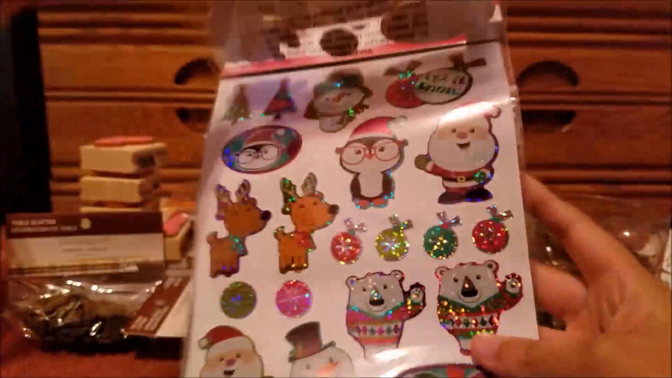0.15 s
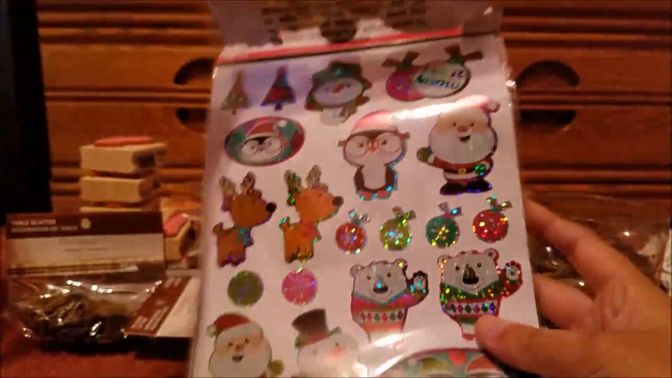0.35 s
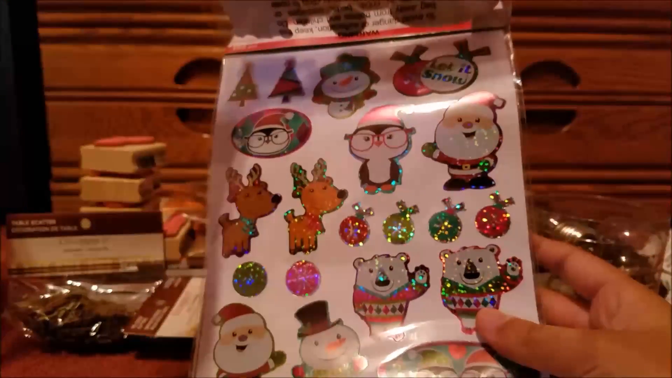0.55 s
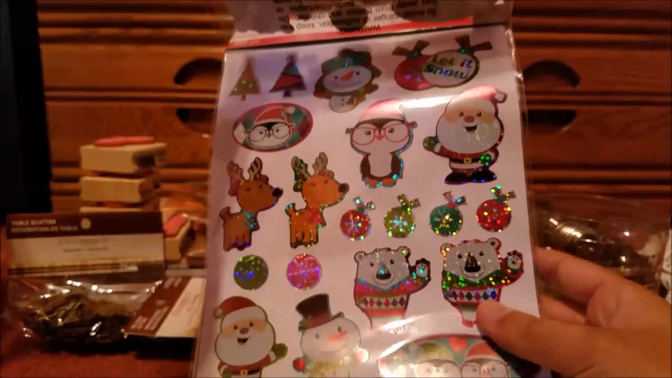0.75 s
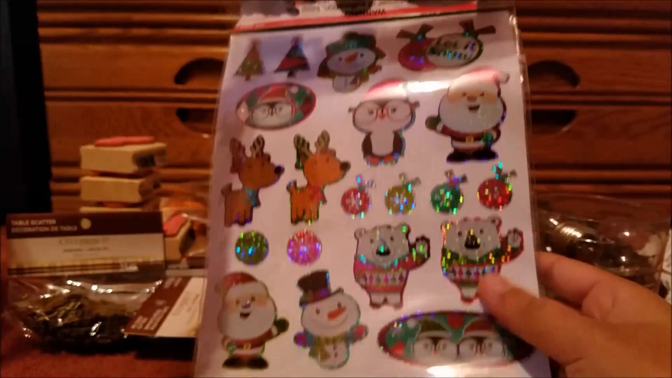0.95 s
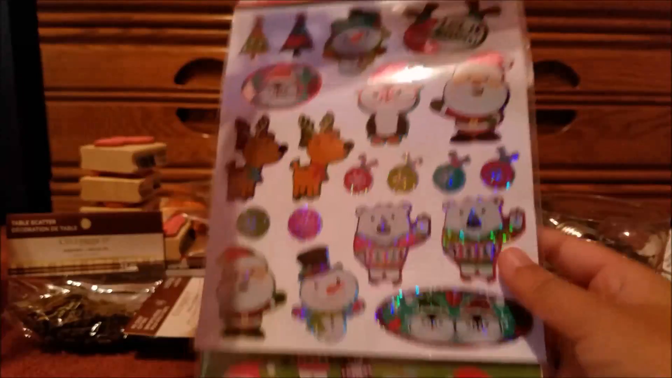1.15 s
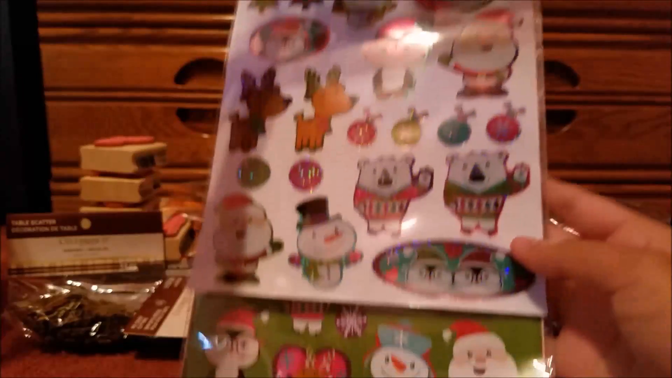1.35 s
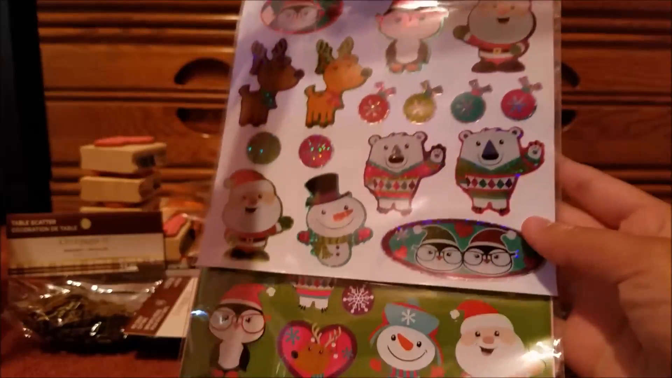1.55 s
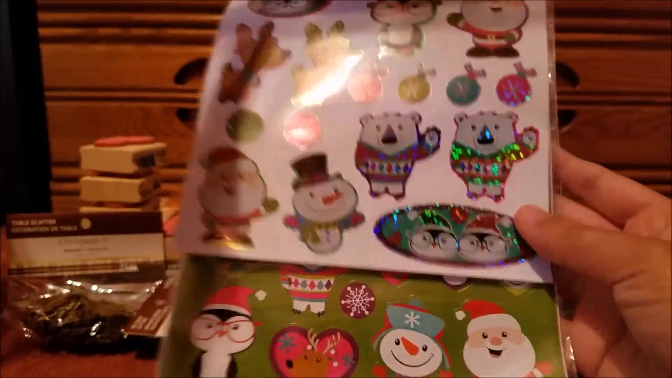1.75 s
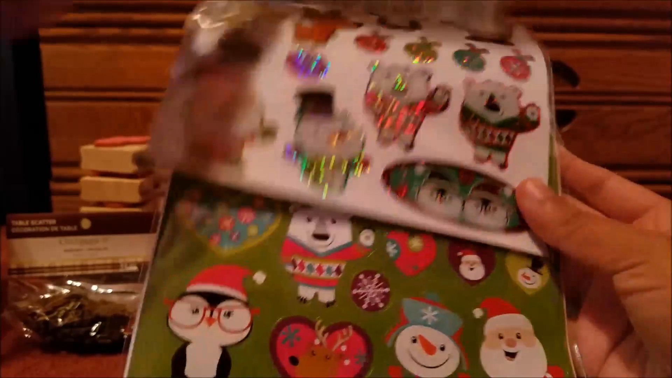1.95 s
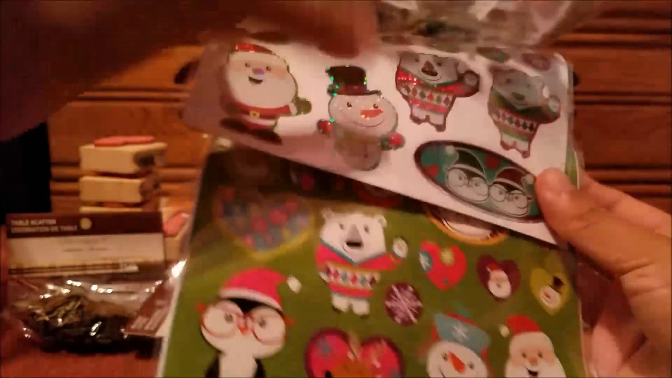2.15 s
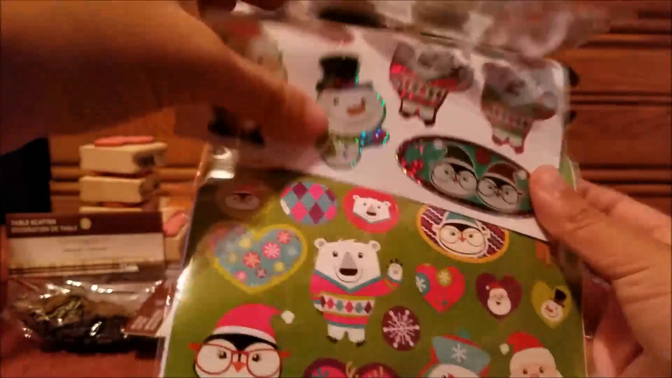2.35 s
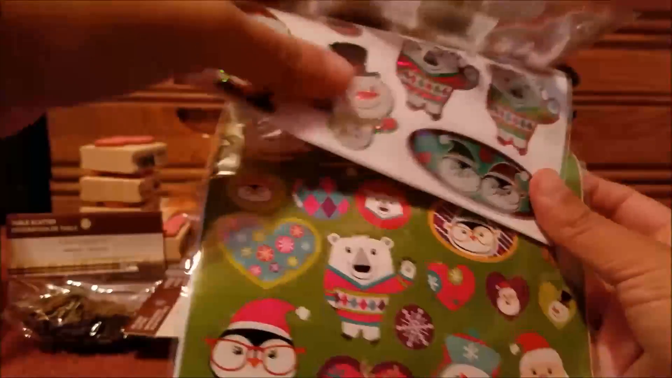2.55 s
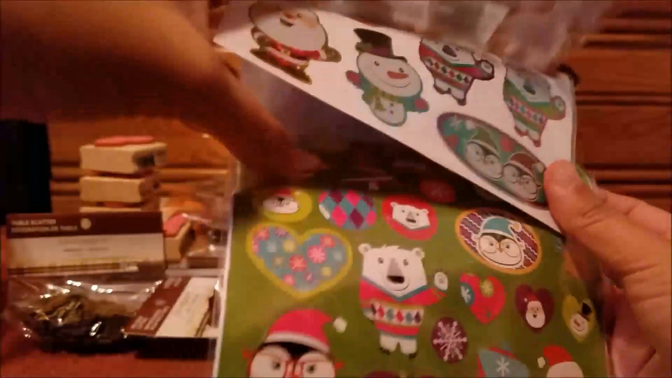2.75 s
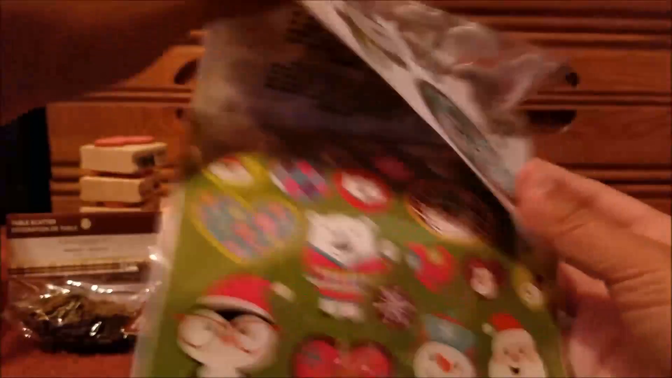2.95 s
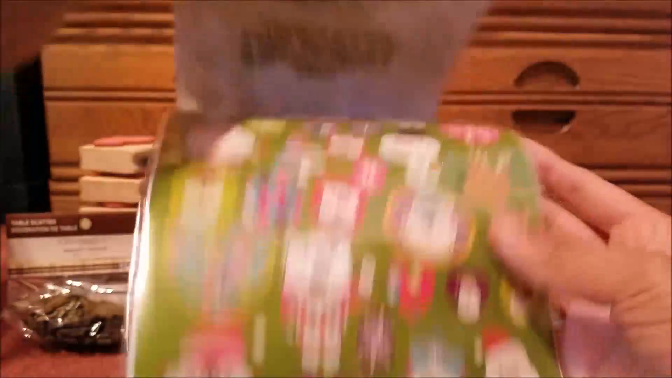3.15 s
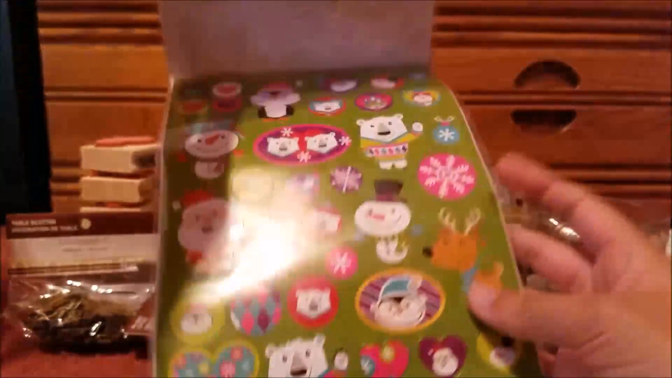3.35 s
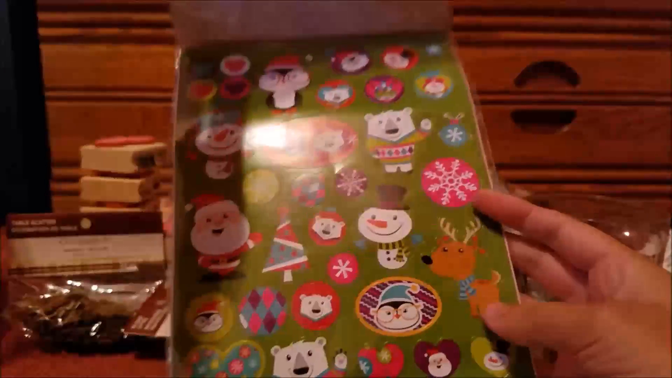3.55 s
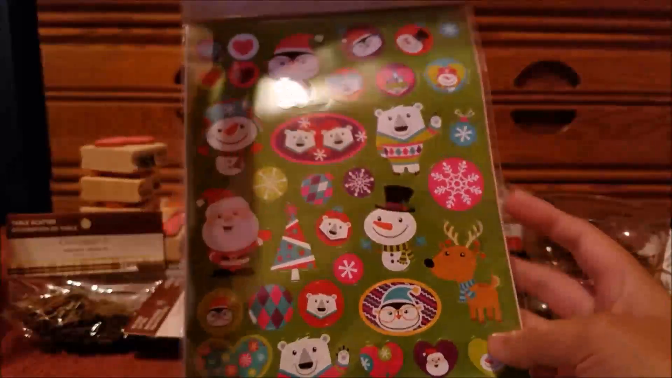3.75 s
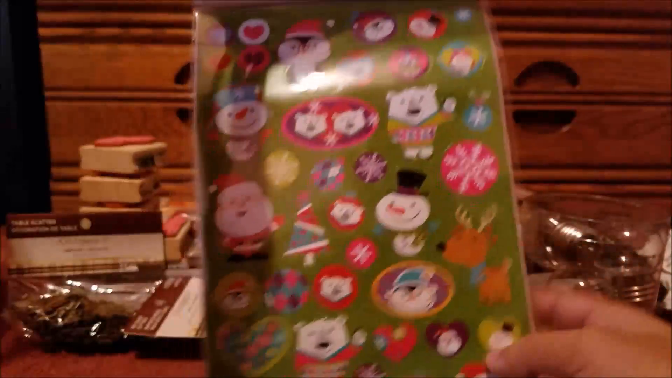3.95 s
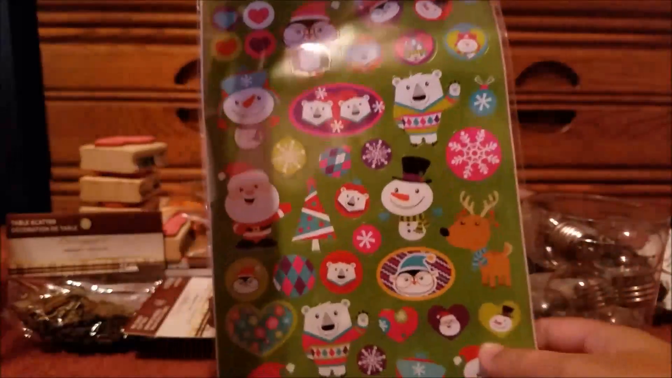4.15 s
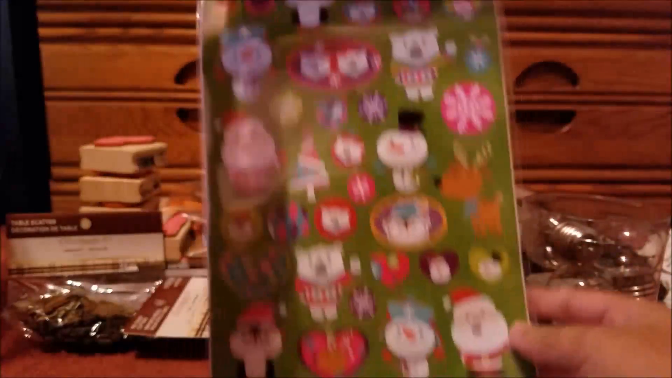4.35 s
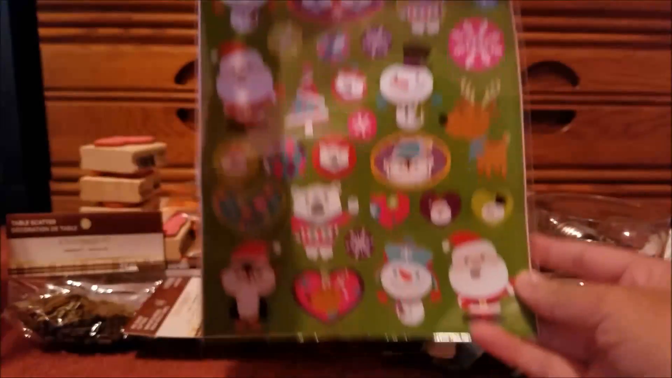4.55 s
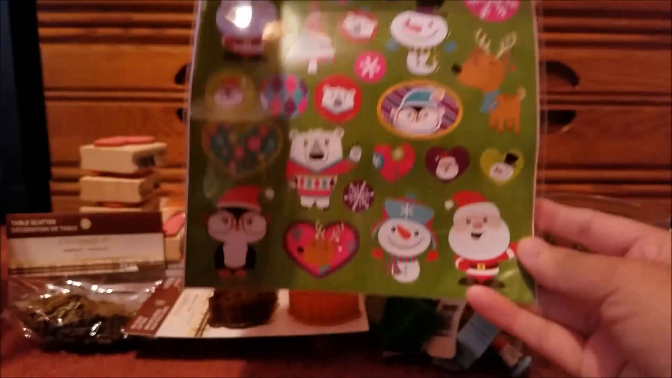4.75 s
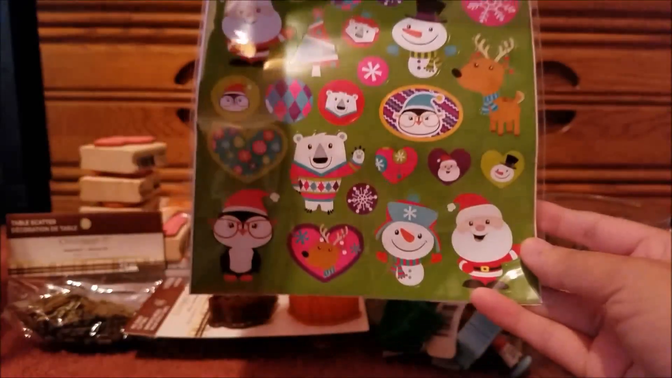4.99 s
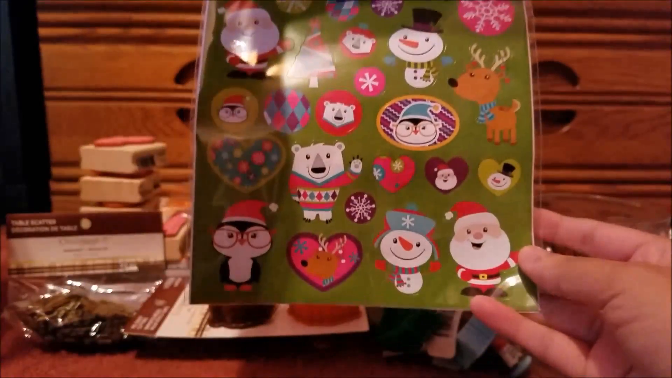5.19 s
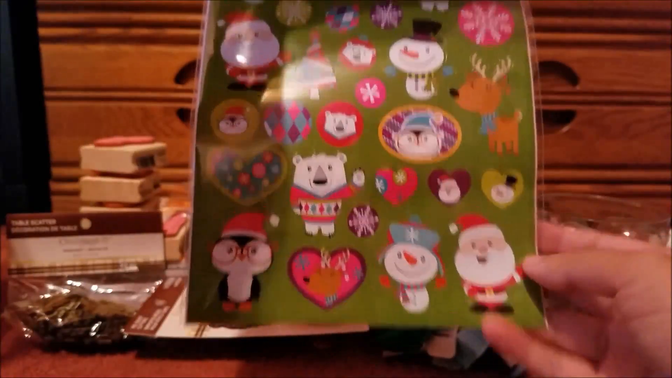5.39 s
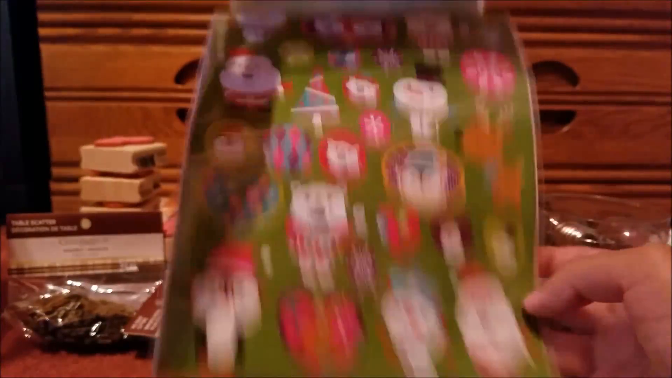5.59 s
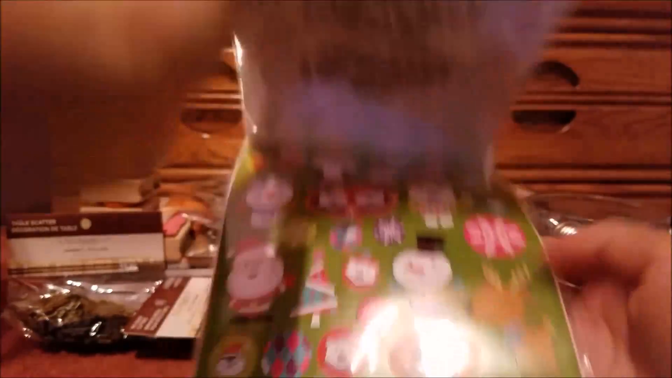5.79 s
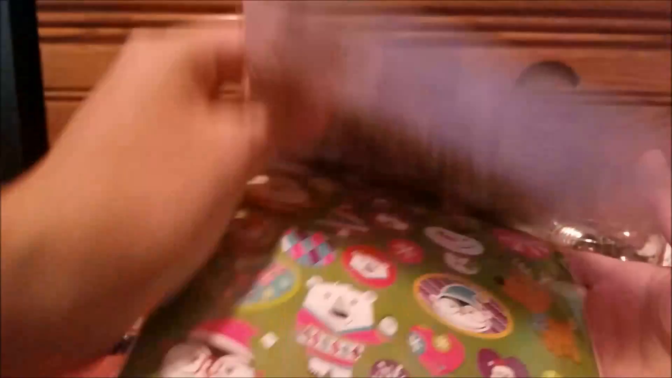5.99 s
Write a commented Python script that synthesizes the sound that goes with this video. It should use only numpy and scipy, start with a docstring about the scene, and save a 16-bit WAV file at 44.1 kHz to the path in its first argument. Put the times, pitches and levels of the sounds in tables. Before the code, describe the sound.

Hands flex sticker sheets in a clear plastic sleeve close to stereo microphones in a quiet room. Faint small ticks come first, then a hard, bright snap at about one second. Denser crinkling and sliding follow through the middle, thinning into near-quiet with a few soft ticks, before crackles return at the end.

```python
"""Creases snapping in a plastic sheet

Hands turn glossy sticker sheets in a clear sleeve, close to two microphones in a quiet room.
Each crease that flips gives a short noise crack and excites a damped bending swing, the pop.
Small creases crackle at random; fingers and sheets slide with a noise hiss, and the flexing pad
pushes soft low air. A short room tail and a quiet floor of hum and hiss complete the sound.
"""
import sys
import numpy as np
from scipy import signal
from scipy.fft import rfft, irfft, next_fast_len
from scipy.io import wavfile
from scipy.ndimage import uniform_filter1d, map_coordinates

SR = 44100
rng = np.random.default_rng(int(sys.argv[2]) if len(sys.argv) > 2 else 0)


def log_audio(samples):
    """Write samples as a 16-bit WAV file to the path given in sys.argv[1]."""
    # one column per channel
    frames = np.atleast_2d(samples).T
    # limit to full scale, then quantise
    limited = np.clip(frames, -1, 1)
    pcm = np.round(limited * 32767).astype(np.int16)
    wavfile.write(sys.argv[1], SR, pcm)


N = 265691  # samples

# Creases that flip loudly; levels are those of the drive, ahead of the filters:
# (time [s], pop level [dB], pop frequency [Hz], crack level [dB], sizzle level [dB])
CREASE_FLIPS = [(0.0088, -47, 1370, -61, -65.5), (0.0218, -52, 1500, -51, -63),
                (0.1348, -40, 1180, -43, -48.5), (0.177, -32, 880, -35, -42), (0.184, -29, 870, -51, -59),
                (0.2004, -38, 1300, -40, -48), (0.2157, -33.5, 1110, -45, -54),
                (0.2287, -38.5, 1510, -43.5, -52), (0.2716, -40, 1390, -58, -45),
                (0.3087, -33, 910, -35.5, -48), (0.3166, -34, 830, -43, -68), (0.3493, -33, 1630, -15, -21),
                (0.408, -40, 890, -59, -66), (0.4142, -34, 1450, -37, -44), (1.0146, -39, 1540, -58, -60),
                (1.0427, -23, 1140, -62, -70), (1.0506, -3.5, 1248, -15.5, -17),
                (1.0642, -26, 1400, -29.5, -44), (1.1083, -53, 2410, -23.5, -26.5),
                (1.1119, -48, 1380, -46, -35), (1.3025, -35, 900, -63, -70),
                (1.6149, -45, 1140, -68.5, -69), (1.671, -32.5, 1255, -54, -66),
                (1.729, -38.5, 1105, -74.5, -61), (1.766, -28, 1240, -47, -61),
                (1.7719, -25, 1003, -44, -61), (1.8897, -33, 1270, -40.5, -55),
                (1.9103, -28.5, 2380, -34, -43), (1.9395, -22.5, 1290, -26.5, -33.5),
                (1.9714, -14.5, 1280, -34, -51), (1.9777, -24, 950, -51, -55), (1.992, -52, 1430, -32, -39),
                (2.001, -27.5, 1290, -54, -61), (2.0751, -34, 1380, -57, -46),
                (2.0864, -23.5, 1200, -70, -62), (2.0946, -15, 1346, -27, -35),
                (2.1032, -15, 1580, -23, -32.5), (2.1312, -27, 1260, -24, -28),
                (2.1515, -13, 1440, -26.5, -34), (2.1907, -40, 1810, -33.5, -39.5),
                (2.2384, -31.5, 1360, -68, -69), (2.286, -33, 1380, -63, -68),
                (2.3288, -22.5, 1520, -25.5, -28.5), (2.375, -25.5, 2500, -40, -46),
                (2.4042, -48, 1600, -47, -43.5), (2.4214, -31.5, 1220, -42, -54),
                (2.4315, -29, 1180, -55, -56), (2.4501, -46, 1420, -48, -52),
                (2.536, -31.5, 1180, -62, -70), (2.5446, -32, 806, -66, -47), (2.5815, -33, 1250, -49, -46),
                (2.5929, -27.5, 1330, -36, -58), (2.6184, -28.5, 2550, -42, -51),
                (2.6518, -31, 2370, -34.5, -35.5), (2.7011, -32.5, 1630, -44.5, -64),
                (2.7342, -37.5, 1220, -54, -69), (2.8279, -38.5, 1480, -56, -59),
                (2.871, -31.5, 1510, -35, -41), (2.8782, -28, 2180, -48, -56), (2.897, -36, 1480, -49, -46),
                (2.9414, -35.5, 2540, -38, -44), (2.9684, -31, 1210, -43, -65),
                (2.9959, -33.5, 1330, -40.5, -58), (3.0327, -34, 1270, -35.5, -36),
                (3.0515, -31, 2330, -32.5, -39), (3.1018, -29, 1020, -32.5, -44),
                (3.1336, -30, 2690, -22.5, -34), (3.2435, -33.5, 1230, -54, -48),
                (3.2951, -21.5, 1420, -40, -63), (3.3484, -34, 1750, -56, -65),
                (3.3619, -25.5, 1220, -26.5, -44), (3.3708, -43, 1440, -42, -57),
                (3.3988, -38, 1380, -41, -33.5), (3.4207, -29.5, 854, -52, -76),
                (3.4966, -28.5, 1950, -38, -49), (3.5186, -34, 1240, -48, -57),
                (3.816, -48, 1260, -43, -43), (4.1659, -50, 1300, -56.5, -53),
                (4.2443, -41, 1236, -43.5, -42.5), (4.313, -52.5, 698, -69, -70),
                (4.4179, -49.5, 1280, -49, -63), (4.5166, -48, 1550, -59, -70),
                (4.655, -51, 1480, -63.5, -72), (4.7284, -37.5, 1300, -44, -44),
                (4.8284, -38, 1240, -52.5, -70), (4.845, -36.5, 1350, -35, -47),
                (5.3928, -49.5, 1410, -66, -70.5), (5.478, -46.5, 1500, -53, -63),
                (5.4918, -36, 805, -45, -63), (5.499, -25, 2470, -34, -45), (5.6474, -30, 1460, -40, -43.5),
                (5.676, -38, 2460, -39, -41.5), (5.6912, -34.5, 1210, -24.5, -26),
                (5.771, -33.5, 1810, -39, -49), (5.8145, -51, 1260, -52, -44), (5.971, -34, 2400, -44, -50),
                (5.9797, -29, 1240, -47.5, -60), (5.999, -33, 1280, -56, -46)]
# Separate moves of the hands, with base levels at the peak:
# (peak time [s], length [s], crackle level [dB], sliding level [dB], flexing level [dB])
HAND_MOVES = [(0.0, 0.047, -55, -77, -62), (0.188, 0.22, -62.5, -59.5, -61.5), (0.348, 0.2, -68, -75, -61),
              (1.074, 0.13, -63, -56.5, -64), (1.305, 0.037, -65, -89, -62), (1.779, 0.17, -65, -66, -64),
              (1.979, 0.29, -51.5, -59, -63.5), (2.107, 0.12, -45, -51.5, -56), (2.223, 0.3, -65, -70, -65),
              (2.279, .02, -71, -78, -59), (2.327, 0.018, -70, -75, -62), (2.344, 0.2, -53, -63.5, -62),
              (2.433, 0.084, -54, -57.5, -58), (2.586, 0.14, -52, -61, -59.5),
              (2.72, 0.32, -59.5, -69, -64.5), (2.901, 0.17, -59, -58, -60.5),
              (3.048, 0.17, -54.5, -54, -68), (3.175, 0.19, -51, -56.5, -58),
              (3.366, 0.078, -51.5, -55.5, -67), (3.532, 0.16, -72, -67, -67.5),
              (3.837, 0.17, -64.5, -65, -64.5), (4.041, 0.13, -65, -64, -72),
              (4.368, 0.1, -62.5, -67.5, -58.5), (4.84, 0.087, -71, -67.5, -76),
              (5.49, 0.042, -54.5, -70, -56), (5.697, 0.13, -56, -58, -53.5), (5.771, 0.015, -68, -75, -54),
              (5.81, 0.19, -58.5, -58.5, -61), (5.866, 0.065, -64, -60.5, -66),
              (5.986, 0.045, -42.5, -54, -51)]
# Decay of the room's answer: (frequency [Hz], time to fall 60 dB [s])
ROOM_DECAY = [(300, 0.49), (1500, 0.2), (5000, 0.21), (14000, 0.05)]
# Spectral shape of the sliding hiss: (frequency [Hz], relative density [dB])
SLIDE_SPECTRUM = [(1500, -4.5), (3000, 2), (5000, -7), (9000, -5.5), (13000, -23.5), (16000, -10.5)]
# Spectral shape of the flexing air: (frequency [Hz], relative density [dB])
FLEX_SPECTRUM = [(30, -21.5), (80, -6), (150, 1), (300, -2), (500, -5), (800, -11.5), (1100, -25.5)]
# Spectral shape of room hum and microphone hiss: (frequency [Hz], relative density [dB])
QUIET_SPECTRUM = [(20, -19), (45, -12), (100, 0), (200, -6), (500, -12), (1600, -16), (3200, -22),
                  (6300, -28), (8000, -30), (10000, -29), (13000, -25.5), (16000, -25)]
# Left-right correlation of the quiet floor: (frequency [Hz], correlation [0-1])
QUIET_CORRELATION = [(60, .8), (290, .35), (700, .1), (3100, 0.0)]

BENDING_HZ = 2380  # centre of the scattered higher bending mode
BENDING_SCATTER_DB = 3  # spread of that mode's strength
THIN_HZ = 386  # the thin sheet radiates little of its pop below this
CRACK_BAND, SIZZLE_BAND = (3450, 5700), (9680, 19000)  # (centre [Hz], width [Hz]) of one filter stage
JERK_DB, GRIT_DB, LUMP_DB = 7, 4.5, 4.5  # depth of crease jerks, hiss grit, flexing lumps
FADE_DB, RISE_SHARE = 21.5, .6  # a move fades this much over its length, swells as much in this share
PUSH_DB, PUSH_S = -30, .015  # jolt of the pad: flexing relative to the crack, time to fade 20 dB
TAIL_DB, TAIL_S = -27.5, 0.049  # rustle of the film: hiss relative to the sizzle, time to fade 20 dB
WET_DB, QUIET_DB = -17.5, -68  # levels of the room's answer and the quiet floor
TOP_HZ, OFFSET = 15900, -0.0004  # upper band limit, constant offset of the output


def flips(s, pop_db, pop_hz, crack_db, sizzle_db, cycles, crack_s):
    """Impulsive excitation: a flipping crease creaks, cracks, and sets the sheet swinging a few cycles."""
    t = np.arange(SR // 60) / SR - .003  # the flip is at t = 0
    after = t.clip(0)
    luck = rng.standard_normal((len(s), 5 + 4 * len(t)))
    lag = np.round(4 * luck[:, 0] - 3).astype(int)  # samples; creases lie all over the sheet
    common, own_l, own_r, sputter = np.split(luck[:, 5:], 4, axis=1)

    # Pop: a damped main mode that follows the crack, plus a higher bending mode
    phase = 2 * np.pi * pop_hz[:, None] * (t - .0003).clip(0)
    life = cycles * amp(0.5 * luck[:, 1:2])
    onset = 1 - np.exp(-(phase / 4) ** 2)
    decay = np.exp(-(phase / (2 * np.pi * life)) ** 0.85)
    swing = np.sin(phase) * onset * decay
    bending_hz = BENDING_HZ * amp(1.8 * luck[:, 3:4])
    higher = np.sin(2 * np.pi * bending_hz * after) * after / 0.00043 * np.exp(-after / 0.00068)
    pop = swing + amp(-9.0 + BENDING_SCATTER_DB * luck[:, 2:3]) * higher

    # Crack: noise under a brief pulse and a jerky creak on both sides of it
    grain = amp(JERK_DB * unit(uniform_filter1d(sputter, size=30, axis=1)))
    creak = 0.097 * np.exp(t.clip(None, 0) / .0012) * np.exp(-after / 0.0029)
    creak = creak * grain * signal.windows.tukey(len(t))
    span = crack_s * amp(4 * luck[:, 4:5])
    shape = (after / span) * np.exp(1 - after / span) + creak
    # the shared noise carries the energy of its shape
    size = np.linalg.norm(shape, axis=1, keepdims=True) / np.linalg.norm(shape * common, axis=1, keepdims=True)
    burst_l = size * shape * (common + .5 * own_l)
    burst_r = size * shape * (common + .5 * own_r)

    def heard(db, left, right):
        """Superposition: scaled sounds add at their flip times."""
        gain = amp(db)[:, None]
        return scatter(s + t[0], gain * left, gain * right, lag)

    pops = filtered(heard(pop_db, pop, pop), lambda hz: 1j * hz / (THIN_HZ + 1j * hz))
    cracks = filtered(heard(crack_db, burst_l, burst_r), lambda hz: band(hz, *CRACK_BAND) ** 2)
    sizzles = filtered(heard(sizzle_db, burst_l, burst_r), lambda hz: band(hz, *SIZZLE_BAND) ** 2)
    return pops + cracks + sizzles


def snaps():
    """Snap-through of large creases: each flips loudly at its listed time."""
    s, pop_db, hz, crack_db, sizzle_db = np.transpose(CREASE_FLIPS)
    return flips(s, pop_db, hz, crack_db, sizzle_db, cycles=1.654, crack_s=0.00054)


def crackle(level_db):
    """Crackling noise: many small random flips, a few far louder than most, mostly near the main mode."""
    luck = rng.random((2400, 4))
    s = luck[:, 0] * (N - 1) / SR
    db = level_db[(s * SR).astype(int)] + 8.5 - 4.0 * np.log(luck[:, 1] + 0.013)
    off = 2 * luck[:, 2] - 1
    hz = 1380 * amp(1.0 * off + 5.2 * off ** 3)
    bright = 14 * (luck[:, 3] - .5)  # dB
    return flips(s, db, hz, db - 7.5 + bright, db - 14 + bright, cycles=1.5, crack_s=0.000067)


def room(x):
    """Reverberation: convolution with noise in which each frequency dies at its own speed."""
    hz, t, z = signal.stft(rng.standard_normal((2, SR // 3)), SR, nperseg=256)
    decay = amp(-60 * t / along(ROOM_DECAY, hz)[:, None])
    tail = signal.istft(z * decay, SR, nperseg=256)[1]
    tail = tail / np.linalg.norm(tail[0])
    delayed = np.pad(x.mean(0), (150, 0))[None]
    return signal.fftconvolve(delayed, tail, axes=1)[:, :N]


def swells(s, db, rise_s, fall_s, fade_db):
    """Addition of powers: events swell to db at s and fade again, on a millisecond grid."""
    t = np.arange(0, N / SR, 1 / 1000) - s[:, None]
    level_db = db[:, None] - fade_db * np.maximum(t / fall_s, -t / rise_s)
    return np.sum(amp(level_db) ** 2, 0) + 1e-14


def handling():
    """Common drive: each move stirs crackle, hiss and flexing [dB]; each snap adds a jolt and a rustle."""
    s, length, *levels_db = np.transpose(HAND_MOVES)
    length = length[:, None]
    crackle_power, slide_power, flex_power = [
        swells(s, db, RISE_SHARE * length, length, FADE_DB) for db in levels_db]
    at, _, _, crack_db, sizzle_db = np.transpose(CREASE_FLIPS)
    slide_power = slide_power + swells(at, sizzle_db + TAIL_DB, 1 / 1000, TAIL_S, 20)
    flex_power = flex_power + swells(at, crack_db + PUSH_DB, 1 / 500, PUSH_S, 20)
    ms = np.arange(N) / SR * 1000
    return [np.interp(ms, np.arange(len(p)), 10 * np.log10(p))
            for p in (crackle_power, slide_power, flex_power)]


def sliding(level_db):
    """Friction noise: fingers and sheets hiss with a gritty, fluctuating level."""
    grit = wobble(150)
    return amp(level_db + GRIT_DB * grit) * rush(SLIDE_SPECTRUM, [(100, 0.058)])


def flexing(level_db):
    """Air displacement: the bending pad pushes low noise in slower lumps, nearly alike left and right."""
    lumps = wobble(40)
    return amp(level_db + LUMP_DB * lumps) * rush(FLEX_SPECTRUM, [(100, 0.94)])


def quiet_floor():
    """Stationary background noise: room hum and microphone hiss."""
    return amp(QUIET_DB) * rush(QUIET_SPECTRUM, QUIET_CORRELATION)


def rush(spectrum, alike):
    """Partial coherence: mid and side noises mix to a set left-right correlation, with rms 1."""
    def response(hz):
        """Rotation: half the arccosine of the correlation shares power between mid and side."""
        turn = np.arccos(np.clip(along(alike, hz), -1, 1)) / 2
        return amp(along(spectrum, hz)) * [np.cos(turn), np.sin(turn)]

    mid, side = filtered(rng.standard_normal((2, N)), response)
    return unit(np.array([mid + side, mid - side]))


def scatter(s, left, right, lag):
    """Arrival-time difference: short sounds sum at their times, the left later by lag samples."""
    at = np.round(s * SR).astype(int)[:, None] + np.arange(left.shape[1])

    def place(rows, shift):
        """Superposition of shifted rows."""
        return np.bincount((at + shift[:, None]).clip(0).ravel(), rows.ravel(), N + SR)[:N]

    return np.array([place(left, lag // 2), place(right, lag // 2 - lag)])


def band(hz, centre_hz, width_hz):
    """Resonance: the complex response of one causal second-order stage."""
    return 1j * hz * width_hz / (centre_hz ** 2 - hz ** 2 + 1j * hz * width_hz)


def filtered(x, response):
    """Linear filtering: the spectrum of x times a response of frequency."""
    m = next_fast_len(N + SR // 2)
    return irfft(rfft(x, m) * response(np.fft.rfftfreq(m, 1 / SR)), m)[..., :N]


def wobble(rate):
    """Random modulation: a smooth curve through rate random knots a second."""
    knots = rng.standard_normal(int(N * rate / SR) + 4)
    return map_coordinates(knots, [np.arange(N) * rate / SR])


def along(points, hz):
    """Logarithmic frequency scale: (Hz, value) points interpolated."""
    f, v = np.transpose(points)
    return np.interp(np.log(hz + 1), np.log(f + 1), v)


def unit(x):
    """Normalisation to rms 1."""
    return x / np.sqrt(np.mean(x ** 2) + 1e-20)


def amp(db):
    """Decibel law: level to amplitude gain."""
    return 10 ** (np.asarray(db) / 20)


def scene():
    """Superposition of snaps and crackle in the room, sliding, flexing and the quiet floor."""
    crackle_db, slide_db, flex_db = handling()
    sheet = snaps() + crackle(crackle_db)
    reverberant = sheet + amp(WET_DB) * room(sheet)
    return reverberant + sliding(slide_db) + flexing(flex_db) + quiet_floor()


def record(dry):
    """Band limitation: the response falls to nothing around TOP_HZ, and a small constant offset is added."""
    return filtered(dry, lambda hz: np.clip((TOP_HZ + 400 - hz) / 500, 0, 1) ** 2) + OFFSET


dry = scene()
out = record(dry)
log_audio(out)
```